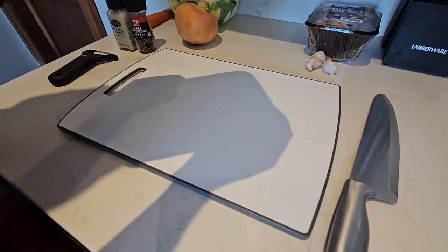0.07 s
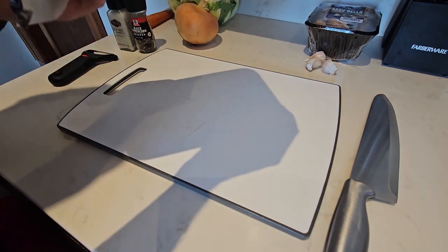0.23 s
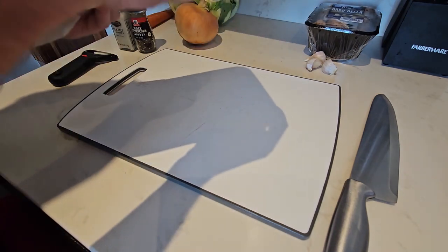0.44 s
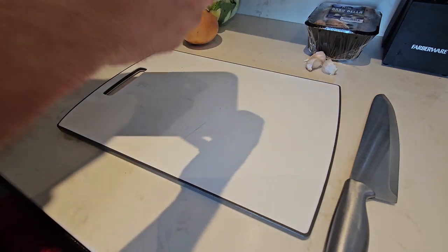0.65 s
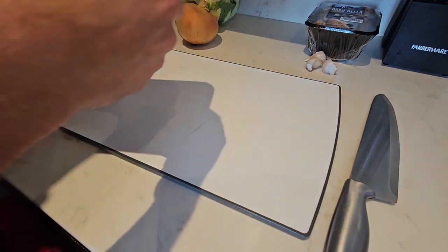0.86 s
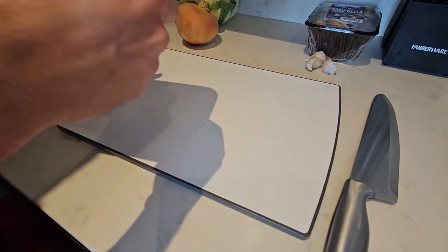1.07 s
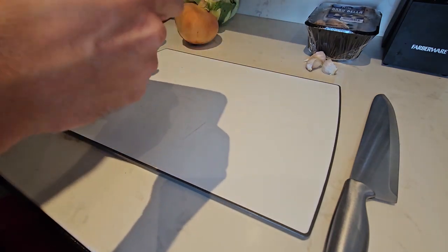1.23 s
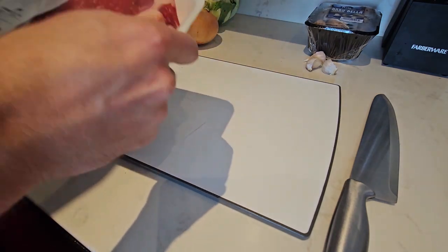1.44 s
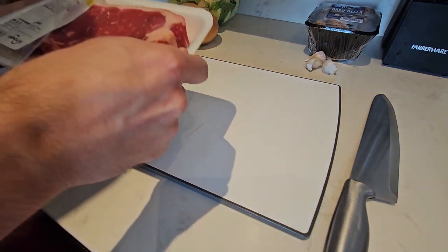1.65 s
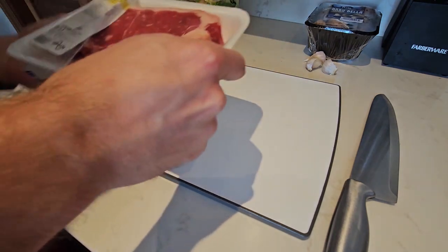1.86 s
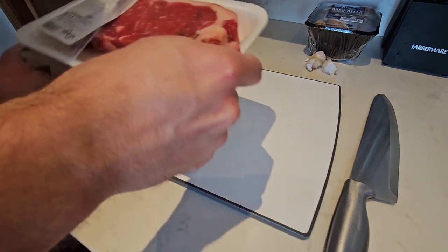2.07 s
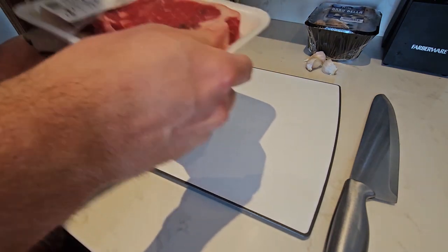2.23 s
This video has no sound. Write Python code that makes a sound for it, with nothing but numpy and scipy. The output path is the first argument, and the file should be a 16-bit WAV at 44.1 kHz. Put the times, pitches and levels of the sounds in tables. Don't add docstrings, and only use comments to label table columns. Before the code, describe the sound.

Thin plastic film is peeled from a foam meat tray: bright tiny cracks and short rustles, a loud snap early on, denser hollow popping past the middle, then lighter crackling over faint kitchen room air.

```python
import sys
import numpy as np
from scipy import signal
from scipy.fft import rfft, irfft
from scipy.io import wavfile
from scipy.ndimage import uniform_filter1d

SR = 44100
rng = np.random.default_rng(int(sys.argv[2]) if len(sys.argv) > 2 else 0)


def log_audio(samples):
    frames = np.atleast_2d(samples).T
    limited = np.clip(frames, -1, 1)
    pcm = np.round(limited * 32767).astype(np.int16)
    wavfile.write(sys.argv[1], SR, pcm)


def gain_from_db(level_db):
    decades = np.asarray(level_db, float) / 20
    return 10 ** decades


N = 101429
PORT_LAG = 9


def evened(x):
    return x / np.sqrt(np.mean(x ** 2) + 1e-20)


def colour(x, points):
    size = x.shape[-1]
    f, db = np.transpose(points)
    hz = np.fft.rfftfreq(size, 1 / SR)
    gain = gain_from_db(np.interp(np.log(hz + 1), np.log(f + 1), db))
    return irfft(rfft(x) * gain, size)


def add(mix, s, sound):
    part = mix[..., round(s * SR):][..., :sound.shape[-1]]
    part += sound[..., :part.shape[-1]]


def ring(hz, t60, size=3000):
    t = np.arange(size) / SR
    return gain_from_db(-60 * t / t60) * np.sin(2 * np.pi * hz * t)


# start in seconds, length in seconds, rustle in dB, brightness in dB.
STRETCHES = [(0, 0.055, -47.5, 4.5), (0.056, 0.071, -43, -7.5), (0.124, 0.0683, -46.5, 1.5),
             (0.202, 0.0693, -47, -3), (0.28, 0.065, -56, 2), (0.371, 0.123, -60.5, 13),
             (0.527, 0.2526, -44, -5), (0.817, 0.132, -44, -4), (0.973, 0.1347, -52, 6.5),
             (1.223, 0.1537, -39, -6), (1.411, 0.0399, -33, -13.5), (1.553, 0.063, -42.5, -3.5),
             (1.76, 0.083, -55, 6.5), (1.856, 0.0613, -42.5, -3.5), (1.916, .08, -78.5, -25.5),
             (2.021, 0.1428, -53.5, 6), (2.18, 0.56, -64, 8)]
# frequency in Hz, level in dB.
RUSTLE_COLOUR = [(350, -45.5), (700, -10.5), (1600, -9.5), (2900, -9.5), (5000, -10), (9000, -12),
                 (10000, -18), (12000, -13.5)]


def rustle():
    rise_s, release_s, sag_db, hiss_db = 0.00136, 0.0055, -4.5, -55.5
    t = np.arange(N) / SR
    dull, bright = np.full((2, N), gain_from_db(hiss_db) ** 2) * gain_from_db([[0], [-4]])
    for s, length, db, bright_db in STRETCHES:
        sag = sag_db * (t - s) / length
        release = 18.5 * np.maximum(t - s - length, 0) / release_s
        shape = np.clip((t - s) / rise_s, 0, 1) * gain_from_db(db + sag - release)
        dull = dull + shape ** 2
        bright = bright + (shape * gain_from_db(bright_db)) ** 2
    clumps = evened(uniform_filter1d(uniform_filter1d(rng.standard_normal(N), 500), 300))
    hits = rng.random(N) < 3000 / SR
    grains = hits * gain_from_db(np.minimum(rng.exponential(1, N), 3)) * rng.standard_normal(N)
    grains = 0.077 * evened(grains) * gain_from_db([[.8], [-.8]])
    both = evened(colour(grains + 4.8 * rng.standard_normal((2, N)), RUSTLE_COLOUR))
    low = colour(both, [(3500, -8.5), (7000, -57.5)])
    moving = low * np.sqrt(dull) + (both - low) * np.sqrt(bright)
    return moving * gain_from_db(np.sqrt(2) * clumps)


# frequency in Hz, level in dB.
AIR_COLOUR = [(15, -7), (40, -5.5), (118, -2), (222, 2), (353, 2.5), (560, -5.5), (870, -18), (2000, -17.5)]
# time in seconds, level in dB.
STIR = [
    (0, 5.5),
    (.2, 1),
    (.6, -2.5),
    (1.0, -1.5),
    (1.299, 1.5),
    (1.8, -1.5),
    (2.3, -0.5),
]


def air():
    a, b = rng.standard_normal((2, N))
    swell = evened(uniform_filter1d(uniform_filter1d(rng.standard_normal(N), 3000), 3000))
    side = 0.342 * signal.lfilter([1, -1], [1, -.96], b) + 0.0574 * b
    hum = evened(colour(np.array([a + side, a - side]), AIR_COLOUR + [(5000, -40.5)]))
    stir_db = np.interp(np.arange(N) / SR, *np.transpose(STIR))
    return gain_from_db(-52 + stir_db + np.log(2) * swell) * hum


# start in seconds, peak in dB, fold ring in dB, fine crack in dB, ring
# in Hz.
SNAPS = [(0.0546, -26.5, -22, -13.5, 3300), (0.138, -25.5, -25, -15, 2000), (0.153, -41, -9.5, -22.5, 2400),
         (0.19, -30, -23, -14, 2780), (0.237, -36, -8.5, -15.5, 1239), (0.243, -31, -11, -22.5, 1496),
         (0.36, -16.5, -29.5, -10, 2360), (0.449, -8.5, -18, -17.5, 2900), (0.552, -25.5, -12, -6, 3000),
         (0.563, -22, -8, -15.5, 2042), (0.718, -40.5, -10.5, -8.5, 1760), (0.764, -40, -20.5, -10.5, 1494),
         (0.8387, -23, -16.5, -14.5, 2390), (0.929, -37.5, -10.5, -11.5, 1750),
         (0.981, -35, -18.5, -7, 1450), (1.4116, -16.5, -16.5, -19, 1460),
         (2.0614, -32.5, -19.5, -12, 2500),
         (0.127, -36, -23.5, -8.5, 3500), (0.354, -25.5, -15, -14, 2330),
              (1.039, -27.5, -14, -16, 1905), (1.224, -49, -27.5, -28.5, 2800),
              (1.299, -14.5, -25.5, -15, 3160), (1.5624, -10.5, -15, -13, 2170),
              (1.569, -25.5, -30.5, -11, 1710), (1.768, -36.5, -21.5, -8.5, 4360),
              (1.849, -19.5, -20.5, -18, 5170), (1.9, -29.5, -46, -12.5, 2230),
              (2.016, -20.5, -45.5, -12, 3820), (2.051, -32.5, -12.5, -17.5, 4200)]
# frequency in Hz, level in dB.
CRACK_COLOUR = [(300, -24.5), (1500, 3.5), (4000, 3.5), (8000, 5), (10000, -0.5), (13000, 4), (15800, -7.5)]


def snap(s, db, fold_db, fine_db, hz):
    burst_s, cracks_per_s, ring_q = 0.00331, 2500, 2.2
    t = np.arange(1500) / SR
    draw, size, fuzz = rng.random((2, 1500)), rng.exponential(1, 1500), rng.standard_normal((2, 1500))
    rise = np.minimum(t / .0016, 1) ** 2
    cracks = (draw[0] < cracks_per_s / SR) * gain_from_db(1.73 * np.minimum(size, 3)) * np.sign(draw[1] - .5)
    cracks = cracks * np.exp(-t / burst_s) * rise
    cracks = cracks + 3.8 * gain_from_db(.3 * (db + 10)) * (np.arange(1500) == 60)
    cracks = cracks / np.linalg.norm(cracks)
    fold = []
    for k in (1.05, .95):
        modes = ring(hz * k, 2.2 * ring_q / hz, size=600)
        modes = modes - .7 * ring(.64 * hz / k, 2.5 * ring_q / hz, size=600)
        modes = modes + .7 * ring(1.5 * hz * k, 1.5 * ring_q / hz, size=600)
        fold.append(np.convolve(cracks, modes)[:1500])
    fine = cracks + 0.2056 * fuzz * np.exp(-t / (1.093 * burst_s)) * rise
    fine = colour(np.pad(fine, ((0, 0), (200, 0))), CRACK_COLOUR)[:, 200:]
    sound = gain_from_db(fold_db + 20.5) * np.array(fold) + gain_from_db(fine_db + 20) * fine
    return s + 0.0011665, gain_from_db(db) * sound


def nearby(x, db):
    t = np.arange(3000) / SR
    signs = rng.choice([-1., 1.], (2, 3000))
    taps = signs * (rng.random((2, 3000)) < .08) * gain_from_db(-60 * t / 0.0549) * (t > .0015)
    taps[1] += signal.lfilter([.12], [1, -.88], taps[0] - taps[1])
    echo = signal.fftconvolve(x, gain_from_db(db) * taps / np.linalg.norm(taps[0]), axes=1)
    return echo + np.pad(x, ((0, 0), (0, 2999)))


# frequency in Hz, t60 in seconds.
KITCHEN = [(300, 0.906), (1500, 0.508), (5000, 0.665), (14000, 0.328)]


def room(x):
    size = SR // 2
    noise = rng.standard_normal((2, size)) * (np.arange(size) / SR > .008)
    hz, frames, z = signal.stft(noise, SR, nperseg=256)
    f, t60 = np.transpose(KITCHEN)
    fade = gain_from_db(-60 * frames / np.interp(np.log(hz + 1), np.log(f), t60)[:, None])
    far = signal.istft(z * fade, SR, nperseg=256)[1][:, :size]
    return signal.fftconvolve(x, gain_from_db(-13.5) * far / np.linalg.norm(far[0]), axes=1)[:, :N]


# start in seconds, level in
# dB, pitch in Hz, t60 in seconds.
TWANGS = [(.4513, -17, 3230, .005), (.4525, -21.5, 2874, 0.046), (.453, -19, 1200, 0.025),
          (.456, -23, 1818, 0.0353), (.5555, -26, 7980, 0.0077), (.5645, -18, 1873, 0.0133),
          (.5665, -27, 2222, 0.0275), (.5685, -28, 1740, .012), (.8395, -33.5, 3540, 0.0044),
          (.8422, -20, 5560, 0.00443), (.8425, -22.5, 1491, 0.0251), (.851, -39, 1623, .02),
          (1.3012, -24.5, 3032, .012), (1.3585, -26.5, 2133, 0.0136), (1.5645, -21, 7390, 0.007),
          (1.8515, -24, 5400, 0.01), (1.852, -25, 7470, 0.0063), (1.854, -36, 3850, 0.016),
          (2.0203, -26, 3623, 0.0111), (2.0265, -42.5, 4495, 0.053), (2.0182, -22.5, 5510, 0.01),
          (2.019, -26, 9000, 0.0026), (2.019, -27, 11500, 0.00225), (2.063, -34, 4550, .008),
          (2.0655, -30.5, 7170, 0.0066), (.1405, -29, 14700, 0.0064), (.144, -30, 9000, 0.0022),
          (.144, -38, 2240, 0.011), (.1525, -39.5, 12000, .004), (.166, -41.5, 13500, .004),
          (.1935, -27, 14100, .008), (.1935, -26, 2116, 0.0088), (.196, -29, 11670, 0.0084),
          (1.4148, -21.5, 3220, 0.0064), (1.4215, -32.5, 1894, 0.0198), (1.4435, -26, 3170, 0.0057),
          (1.5648, -20, 1960, 0.0042), (1.5665, -28, 3300, .005), (1.5725, -26, 8800, 0.0057),
          (1.578, -25.5, 4660, 0.0118), (1.768, -30, 6340, 0.0076), (1.6605, -29, 679, 0.0307),
          (1.2405, -36, 520, .02), (1.262, -36, 560, .03), (1.268, -35, 640, .02), (1.2765, -35, 500, .025),
          (1.288, -34, 620, .025), (1.3735, -34, 520, .02), (1.2245, -38, 2900, .012),
          (1.632, -35, 640, .025)]


def twangs():
    rise_s, near_db, split = 0.000418, -5.5, 0.0363
    out, t = np.zeros((2, N)), np.arange(3000) / SR
    for s, db, hz, t60 in TWANGS:
        left = ring(hz * (1 + split), t60)
        right = np.roll(ring(hz * (1 - split), t60), PORT_LAG)
        tone = np.array([left, right]) * np.minimum(t / rise_s, 1)
        add(out, s, nearby(gain_from_db(db) * tone, near_db))
    return out


# start in seconds, level in dB, edge click in dB, pitch as a ratio.
POPS = [(0.242, -27, -7, 1.63), (0.282, -39.5, 0, 1.49), (0.45, -24, -3.5, 0.928), (1.043, -27, 2, 0.988),
        (1.115, -25, -3, 0.88), (1.224, -30, -13, 1.15), (1.3, -27.5, 3, 0.96), (1.3241, -20.5, -22, 0.55),
        (1.339, -26, -18.5, 0.44), (1.3542, -23, -8.5, 1.176), (1.4111, -20, -4, .9),
        (1.4418, -19.5, -11.5, 0.948), (1.514, -17.5, -2.5, 0.857), (1.527, -19, -8.5, 1.006),
        (1.546, -18, -7.5, 0.926), (1.5595, -19, -13, 0.927), (1.594, -19, -7, 0.804),
        (1.6593, -15, -3.5, 0.8663), (1.896, -34, 3, 0.764), (2.064, -32, -10.5, 0.874),
        (2.226, -36.5, -7.5, 1.128)]
# frequency in Hz, level in dB, t60 in seconds.
TRAY = [(450, 1, 0.052), (545, -1, 0.03), (593.4, 2.5, 0.024), (760, -4, .018), (1032.1, -10.5, 0.1113),
        (1081, -11, 0.084), (1493.5, -2, 0.0655), (1898, 1, 0.038)]
# frequency in Hz, level in dB.
EDGE_COLOUR = [(1000, -58), (2000, 2), (4800, -5), (6500, -18), (15000, -22)]


def pop(s, db, edge_db, ratio):
    bounce_s, bounce_db = 0.0024237, -8.5
    t = np.arange(3000) / SR
    shift = 1 + 0.0178 * rng.standard_normal(len(TRAY))
    lift = 2.0 * rng.standard_normal(len(TRAY))
    body = np.zeros(3000)
    for k, (hz, mode_db, t60) in enumerate(TRAY):
        mode = ring(hz * ratio ** 0.2765 * shift[k], t60)
        body += (-1) ** (k // 3) * gain_from_db(mode_db + lift[k]) * mode
    noise = rng.standard_normal((3, 3000))
    edge = evened(colour(noise[0] + 2.03 * noise[1:], EDGE_COLOUR))
    edge = edge * (np.exp(-t / .0008) + 0.224 * np.exp(-t / 0.0063))
    flip = gain_from_db(15) * ring(1150 * ratio, .005)
    crack = gain_from_db(edge_db + 12.5) * edge - flip
    bounce = gain_from_db(bounce_db) * np.roll(crack, round(bounce_s * SR), axis=1)
    return s + 0.0013928, gain_from_db(db - 15.5) * (body + crack + bounce) * gain_from_db([[1.8], [-1.8]])


def thump():
    hz = 147.7
    modes = ring(hz, 0.09) + .25 * ring(0.56 * hz, 0.019)
    modes = modes + 1.46 * ring(1.37 * hz, 0.112) + 5.67 * ring(2.6 * hz, 0.0456)
    return gain_from_db(-39) * modes * np.minimum(np.arange(3000) / SR / 0.00152, 1)


def scene():
    spots = np.zeros((3, 2, N))
    hits = [(*snap(*row), -5) for row in SNAPS]
    hits += [(*pop(*row), -9) for row in POPS]
    for k, (s, sound, near_db) in enumerate(hits):
        add(spots[k % len(spots)], s, nearby(sound, near_db))
    low_cut = signal.butter(4, 360, "high", fs=SR, output="sos")
    near = signal.sosfilt(low_cut, sum(x + room(x) for x in spots))
    near[1] = np.roll(near[1], PORT_LAG)
    add(near, 1.301, thump())
    return near + rustle() + air() + twangs()


def band_limit(x):
    return signal.sosfilt(signal.butter(12, 16810, fs=SR, output="sos"), x)


# frequency in Hz, level in dB.
MIC = [(15700, 1), (16100, -28.5), (17000, -30.5)]


def record(dry):
    mix = colour(dry, MIC)
    return band_limit(mix)


dry = scene()
out = record(dry)
log_audio(out)
```